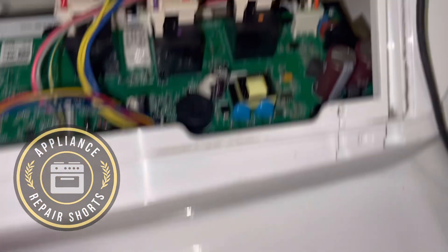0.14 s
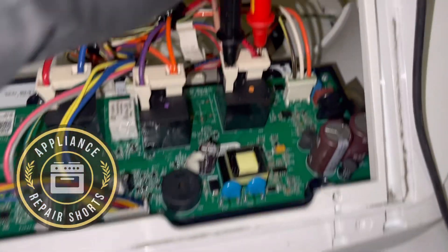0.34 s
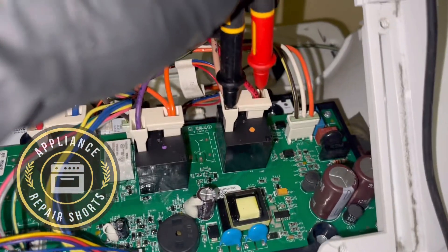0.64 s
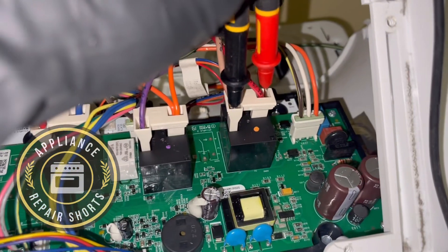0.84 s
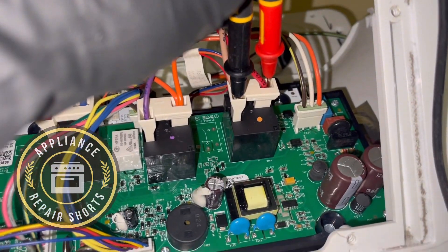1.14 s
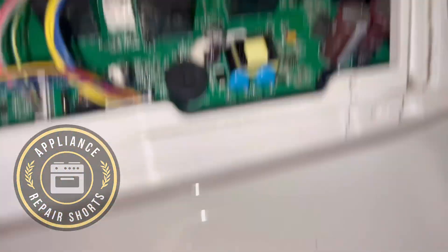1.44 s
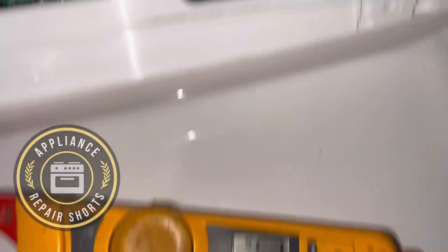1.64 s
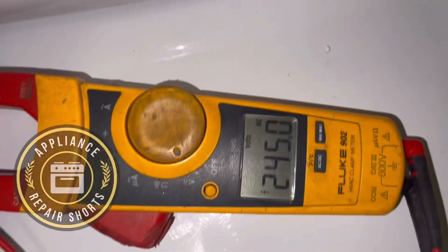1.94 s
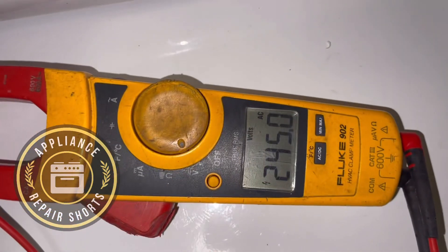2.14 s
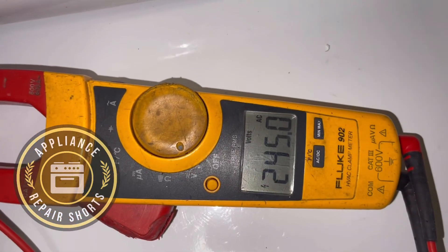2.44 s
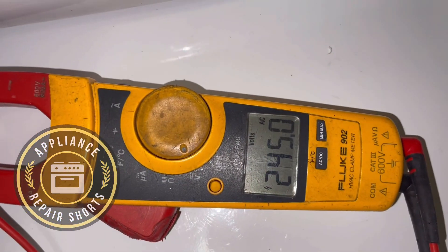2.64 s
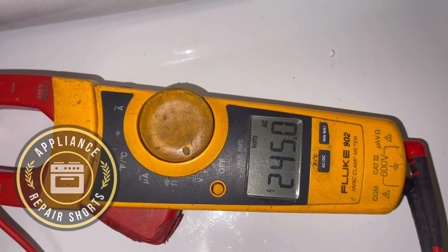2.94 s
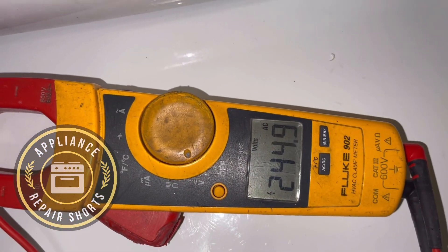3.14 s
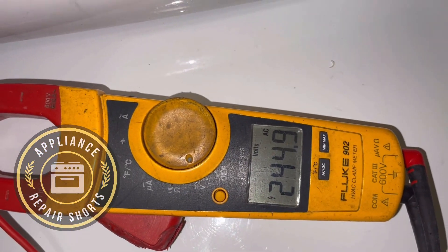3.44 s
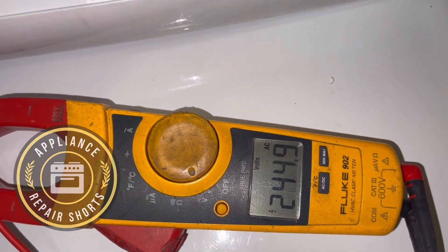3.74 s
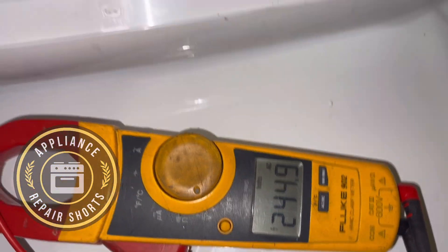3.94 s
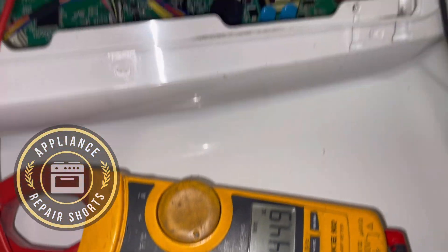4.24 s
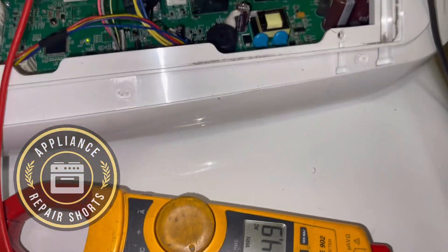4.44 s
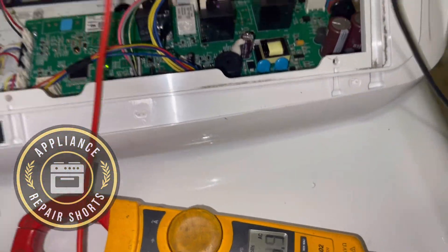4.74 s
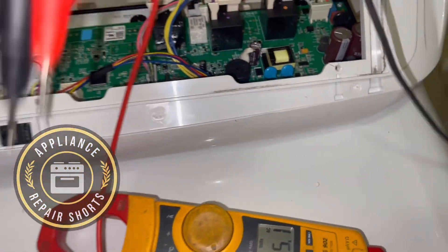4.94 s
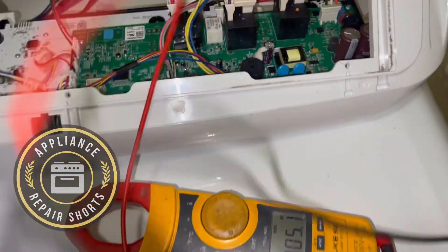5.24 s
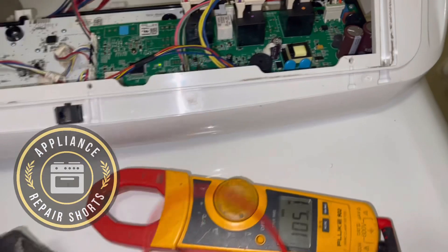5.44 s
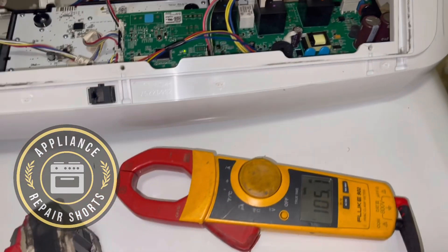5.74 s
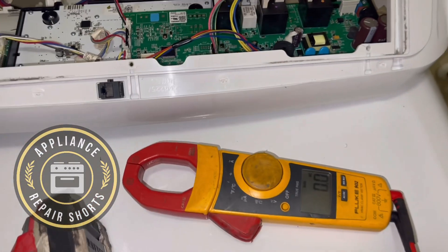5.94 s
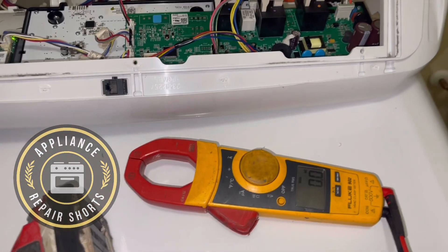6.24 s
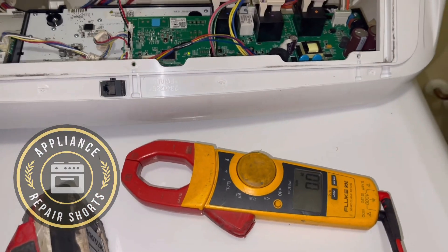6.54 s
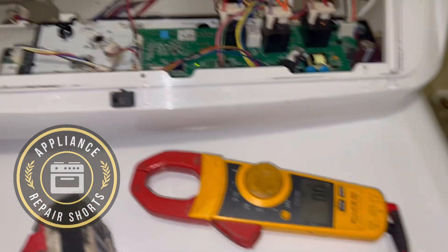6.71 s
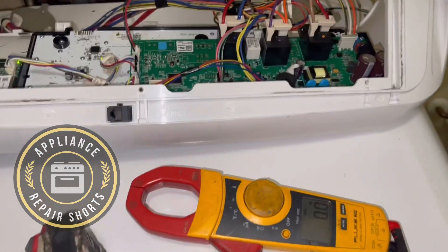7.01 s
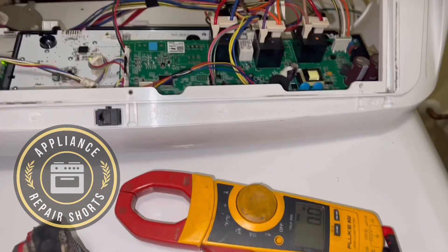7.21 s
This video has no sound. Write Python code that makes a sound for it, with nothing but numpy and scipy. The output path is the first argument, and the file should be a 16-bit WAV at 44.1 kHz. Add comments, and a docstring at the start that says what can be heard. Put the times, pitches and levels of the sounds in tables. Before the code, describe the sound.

A clothes dryer runs in a small room, close to a hand-held stereo microphone. Its motor hums low, the drum rumbles, and a soft blower hiss swells with each turn. From about four seconds the microphone backs away slightly, and test probes and leads tick and scrape on the plastic console, with a quick cluster of taps and a soft glove rustle. The dryer keeps running throughout.

```python
"""A clothes dryer runs with its console open in a small room, close to a hand-held stereo microphone pair.
The motor hums on the mains, the drum rolls, the cabinet rumbles, and shaft, belt and panels add wavering
tones. The blower's hiss swells with each drum turn, and the rumble spreads wide when the microphone swings.
From about four seconds on the microphone backs away, while test probes, leads and a glove tick, scrape
and rustle on the plastic console and the cabinet top."""
import sys
import numpy as np
from scipy import signal
from scipy.fft import rfft, irfft
from scipy.io import wavfile
from scipy.ndimage import uniform_filter1d

SR = 44100
rng = np.random.default_rng(int(sys.argv[2]) if len(sys.argv) > 2 else 0)


def transcribe(u):
    """Save the signal u as a 16-bit wav file named by the first command-line argument.

    u: samples, shape (n,) or (channels, n), limited to [-1, 1]; the rate is SR.
    q: integer samples, one column per channel.
    """
    v = np.clip(np.atleast_2d(u).T, -1, 1)
    q = np.round(v * 32767).astype(np.int16)
    wavfile.write(sys.argv[1], SR, q)


N = 325017
TIME = np.arange(N) / SR
CONTROL_TIME = TIME[::256]  # coarse grid for level curves [s]


def amp(db):
    """Decibels to gain."""
    return 10 ** (np.asarray(db) / 20)


def unit_rms(x):
    """Scales to rms 1."""
    return x / np.sqrt(np.mean(x ** 2) + 1e-20)


def curve(points, x):
    """Straight lines through (x, value) points."""
    return np.interp(x, *np.transpose(points))


def log_curve(points, hz):
    """A spectrum joined by straight lines on a log-frequency axis."""
    f, value = np.transpose(points)
    return np.interp(np.log(hz + 1), np.log(f + 1), value)


def pan(left_db):
    """Left and right gains that put the left this many dB above the right."""
    return amp(np.vstack([left_db / 2, -left_db / 2]))


def phase_ahead(hz):
    """Phase by which the left microphone leads for sound from ahead."""
    # phase between the microphones (frequency [Hz], left lead [rad])
    phase = [(0, 0), (600, -.1), (1100, -.2), (1900, .1), (4850, 3.14), (5750, 6.28), (6250, 6.28),
             (8500, 9.42), (9600, 9.42), (11750, 12.57), (13000, 12.57)]
    return curve(phase, hz)


def likeness_ahead(hz):
    """How alike the two microphones hear sound from ahead."""
    # coherence of the pair (frequency [Hz], likeness [0-1])
    coherence = [(0, .999), (300, .995), (600, .75), (900, .88), (1800, .96), (2700, .45), (4000, .45),
                 (4800, .8), (5400, .6), (5750, .995), (6200, .995), (6500, .8), (8200, .82), (8700, 1),
                 (9600, 1), (9800, .88), (11500, .8), (12200, .9)]
    return curve(coherence, hz)


def swing(t):
    """Share of the rumble that spreads wide as the microphone swings."""
    # swings of the hand (time [s], wide share before clipping [ratio])
    swings = [(0, 0.5), (.35, 0.5), (.52, 0.04), (1.17, 0.04), (1.3, 0.97), (1.54, 0.92), (1.62, 0.03),
              (1.8, 0.01), (3.65, 0), (4.03, 0.47), (4.14, 1.05), (4.26, 1.1), (4.32, 0.4), (4.5, 0.79),
              (4.9, 0.07), (5.15, 0.99), (5.35, 0.57), (6.0, 0.64), (6.25, 0.98), (6.45, 0.81),
              (6.57, 1.04), (6.61, 1), (6.64, .8), (6.68, 0.98), (6.76, 0.99), (6.85, 0.78), (7.0, 1.02),
              (7.1, 0.5), (7.37, 0.57)]
    return np.clip(curve(swings, t), .001, .999)


def backed_off(t):
    """How far the microphone has backed away, 0 to 1."""
    return np.interp(t, (4.2, 5.8), (0, 1))


def low_bus_db(t):
    """Level of the drum roll and low tones: they drop as the microphone backs away."""
    return -42 - 4 * backed_off(t)


def high_bus_db(t):
    """Level of the upper tones: they sag slowly and duck in a swing."""
    sag_db_per_s, duck_depth = 0.86, 0.75
    return -47 - sag_db_per_s * t + duck_depth * 10 * np.log10(1 - swing(t))


def drum_swell_db(t):
    """The swells that repeat with every turn of the drum."""
    # one turn (time into the turn [s], level [dB])
    swells = [(0.0, -3.5), (0.15, 2), (0.28, -5), (0.37, 0.5), (0.48, 3), (0.56, -1), (0.63, 2.5),
              (0.69, -1), (0.77, 1.5), (0.87, 1.5), (0.95, 3), (1.04, 0.5), (1.12, 1)]
    turn_s = 1.212
    return np.interp(t, *np.transpose(swells), period=turn_s)


def noise_bed(spectrum, fader, patchy_db, flicker_db, left_db, phase=phase_ahead, likeness=likeness_ahead):
    """Stereo noise with drifting patches and broad flicker, riding a fader of (times [s], levels [dB])."""
    hz, t, white = signal.stft(rng.standard_normal((2, N)), SR, nperseg=1024, noverlap=768)
    patches, flicker = rng.standard_normal((2,) + white[0].shape)
    patches = unit_rms(uniform_filter1d(uniform_filter1d(patches, size=12, axis=0), size=8, axis=1))
    flicker = unit_rms(uniform_filter1d(uniform_filter1d(flicker, size=200, axis=0), size=7, axis=1))
    same = np.clip(likeness(hz), 0, 1)[:, None]
    right = (same * white[0] + np.sqrt(1 - same ** 2) * white[1]) * np.exp(-1j * phase(hz))[:, None]
    level_db = log_curve(spectrum, hz)[:, None] + np.interp(t, *fader)
    gain = amp(level_db + patchy_db * patches + flicker_db * flicker) * np.sqrt(SR / 2)
    pair = signal.istft(np.array([white[0], right]) * gain, SR, nperseg=1024, noverlap=768)[1]
    return pair[:, :N] * pan(left_db)


def cabinet_rumble():
    """The cabinet rumbles with the drum's swells; a swing crossfades it from straight ahead to wide."""
    # rumble from ahead (frequency [Hz], density [dB/Hz])
    front_spectrum = [(250, -100), (330, -72), (390, -77), (450, -71.5), (650, -79.5), (850, -79.5),
                      (1100, -83.5), (1500, -90.5), (2000, -95), (2600, -99.5)]
    # rumble spread wide (frequency [Hz], density [dB/Hz])
    wide_spectrum = [(25, -74), (40, -92), (70, -68.5), (100, -57.5), (170, -80.5), (260, -58.5),
                     (330, -76), (430, -70), (650, -75), (850, -74), (1100, -81), (1500, -87.5),
                     (2000, -95), (2600, -101)]
    # the pair turned aside (frequency [Hz], left lead [rad], likeness [ratio])
    turned_aside = [(0, 0.51, 0.85), (246, 2.28, 0.91), (444, 3.25, 0.63), (647, 3, 0.85), (855, 2.98, 0.9),
                    (940, 3.02, 1.05), (1090, 3.2, 0.97), (1245, 3.2, 0.91), (1390, 4.44, 0.49),
                    (1880, 5, 0.075), (2580, 9.7, 0.94)]
    f, lead, same = np.transpose(turned_aside)
    top_cut = [(3600, -110), (5500, -150)]  # (frequency [Hz], density [dB/Hz])
    t = CONTROL_TIME
    swell_db, distance_db = drum_swell_db(t), -1.5 * backed_off(t)
    front_db = 1 + 10 * np.log10(1 - swing(t)) + 0.52 * swell_db + distance_db
    wide_db = 2.5 + 10 * np.log10(swing(t)) + 0.23 * swell_db + distance_db
    front = noise_bed(front_spectrum + top_cut, (t, front_db), patchy_db=1.5, flicker_db=0.7, left_db=1)
    wide = noise_bed(wide_spectrum + top_cut, (t, wide_db), patchy_db=2.5, flicker_db=2, left_db=0.15,
                     phase=lambda hz: np.interp(hz, f, lead), likeness=lambda hz: np.interp(hz, f, same))
    return front + wide


def blower_hiss():
    """The blower's bright rush of air swells with each drum turn."""
    # hiss colour (frequency [Hz], density [dB/Hz])
    spectrum = [(1200, -110), (2300, -93.5), (3000, -97), (4500, -96), (6500, -99), (8500, -96),
                (10800, -95), (11300, -97.5), (11600, -100), (11900, -110), (12200, -125), (12500, -150)]
    fader = (CONTROL_TIME, drum_swell_db(CONTROL_TIME))
    return noise_bed(spectrum, fader, patchy_db=1.56, flicker_db=1.38, left_db=0)


def drum_roll():
    """The turning drum lays down a deep bed of noise."""
    # roll colour (frequency [Hz], density re the low bus [dB/Hz])
    spectrum = [(25, -26), (40, -32), (72, -33), (100, -15), (145, -25.5), (170, -24.5), (260, -19),
                (330, -33), (500, -100)]
    fader = (CONTROL_TIME, low_bus_db(CONTROL_TIME))
    return noise_bed(spectrum, fader, patchy_db=1.5, flicker_db=0, left_db=1.5)


def motor_hum():
    """The motor's iron pulls twice per mains cycle: clean harmonics that widen as the pair turns aside."""
    # hum ride (time [s], fundamental [dB], 4th harmonic [dB], turned aside [0-1])
    ride = [(0, -34, -50.5, 0.06), (.5, -37.5, -46, 0.04), (1.15, -34.5, -47, 0), (1.5, -36, -50, 0.14),
            (2.2, -31.5, -49, 0), (2.7, -34.5, -49.5, 0), (3.2, -32.5, -48, 0), (3.85, -34, -49.5, 0.13),
            (4.25, -36, -43.5, 0.8), (4.6, -35.5, -45, 0.42), (5.05, -39.5, -45, 0.6),
            (5.35, -37, -45, 0.87), (5.6, -45, -42, 0.9), (5.9, -37.5, -59, 1), (6.25, -42, -46.5, 1),
            (6.5, -41, -52.5, 0.93), (7.05, -37, -47, 0.17), (7.37, -39, -60.5, 0)]
    # the 2nd harmonic swells and sinks (time [s], level [dB])
    second_ride = [(0.0, -43.5), (0.02, -38.5), (0.65, -41.5), (0.76, -50), (0.9, -40), (1.17, -49),
                   (1.44, -33.5), (1.5, -44), (1.6, -36), (1.68, -46), (1.78, -36), (2.05, -48),
                   (2.11, -40.5), (3.1, -40.5), (3.22, -52), (3.33, -37.5), (3.55, -50), (3.57, -43.5),
                   (4.33, -40.5), (4.5, -49), (4.58, -39), (4.82, -43), (5.15, -40), (5.21, -55),
                   (5.38, -38), (5.56, -48.5), (6.65, -42.5), (6.69, -53), (6.75, -43), (6.83, -59),
                   (6.9, -43), (7.12, -48), (7.2, -42), (7.37, -48)]
    hum_hz = 120.0
    times, *columns = np.transpose(ride)
    first_db, fourth_db, aside = (np.interp(TIME, times, column) for column in columns)
    # (harmonic, level [dB], left lead when aside [rad], left over right [dB], widening by a swing [0-1])
    harmonics = [(1, first_db, 1.14, 0.76, .05), (2, curve(second_ride, TIME), 1.55, 2.1, .1),
                 (4, fourth_db, 2.86, 0.87, 0.64), (5, high_bus_db(TIME) - 8.5, 2.7, .8, 0.52)]
    out = np.zeros((2, N))
    for harmonic, db, lead, left_db, widening in harmonics:
        phase = 2 * np.pi * (harmonic * hum_hz * TIME + rng.random())
        turned = aside + widening * swing(TIME) * (1 - aside)
        out += np.sqrt(2) * amp(db) * pan(left_db) * np.cos([phase, phase - lead * turned])
    return out


def machine_tones():
    """Shaft, belt and panels sing in narrow noise bands that waver in level and pitch."""
    # fuzzy tones (frequency [Hz], width [Hz], level re their bus [dB], left lead [rad])
    bands = [(57, 4, -6.5, 0.054), (90.6, 8, -5.5, 0.041), (107.6, 8.4, -9, 0.05), (253, 7, -8.5, 0.18),
             (269.1, 6.6, -8, 0.18), (302, 6.1, -15, 0.15), (352, 13, -12, 0.15), (422.7, 6.2, -14, 0.43),
             (507.8, 2.8, -6.5, 0.25), (553.7, 4.3, -5, 1.66), (626.5, 3.7, -14, 0.74),
             (864, 66, -8.5, 0.2), (1178, 43, -16, 0.27), (1370, 75, -18, 0.35)]
    low_db, high_db = low_bus_db(TIME), high_bus_db(TIME)
    out = np.zeros((2, N))
    for hz, width_hz, db, lead in bands:
        pole = np.exp(-np.pi * abs(width_hz) / SR)
        real, imag = rng.standard_normal((2, N))
        waver = signal.lfilter([1], [1, -2 * pole, pole * pole], real + 1j * imag)
        steady = 1.13 * (width_hz < 6)  # the narrowest tones have a steady core
        tone = (waver / np.std(waver) + steady) * np.exp(2j * np.pi * hz * TIME)
        pair = unit_rms(np.array([tone.real, (tone * np.exp(-1j * lead)).real]))
        panel_db = 4.5 * swing(TIME) * (200 < hz < 297.3)  # panel tones swell in a swing
        bus_db = low_db if hz < 385 else high_db
        out += amp(db + panel_db + bus_db) * pair
    return out


def console_touch(start_s, db, rise_s, t60_s, centre_hz, spread_octaves, ring, top_cut=None):
    """One touch on the console: a grainy burst of noise sets the plastic ringing."""
    # console modes (frequency [Hz], t60 [s], level re the plain burst [dB])
    modes = [(820, .04, 11), (1186, 0.035, 11), (1516, 0.02, 7), (1940, 0.053, 11), (2660, 0.034, 11),
             (2990, 0.033, 5), (3350, 0.045, 11), (4130, 0.04, 9), (5760, 0.016, 5.5), (6440, 0.022, -1),
             (7600, 0.011, -1), (9200, 0.0023, 8.5), (10750, 0.0065, 7.5), (11500, 0.011, 12)]
    # the microphones dull the top of a touch (frequency [Hz], gain [dB])
    treble = [(11500, -3), (12000, -10), (14500, -23), (15500, -30)]
    size, pre_roll = 16384, 256  # samples; the pre-roll holds the filter's short run-up
    grain_db, grain_s, least_likeness, right_db = 2, .0007, 0.69, 0.5
    t, hz = np.arange(size) / SR, np.fft.rfftfreq(size, 1 / SR)
    left, other = rfft(rng.standard_normal((2, size)))
    same = np.maximum(likeness_ahead(hz), least_likeness)  # so close a sound stays alike in both sides
    same = np.clip(same * np.interp(hz, (600, 4500), (.6, 1)), 0, 1)  # wider toward the bass
    right = (same * left + np.sqrt(1 - same ** 2) * other) * np.exp(-1j * phase_ahead(hz))
    envelope = np.minimum(t / rise_s, 1) * amp(-60 * np.maximum(t - rise_s, 0) / t60_s)
    slips = unit_rms(uniform_filter1d(rng.standard_normal(size), size=round(grain_s * SR)))
    envelope *= amp(grain_db * min(t60_s / 0.024, 1) * slips)  # the touch catches and slips
    burst = envelope * irfft(np.array([left, right * amp(right_db)]))
    plastic = sum(amp(mode_db) / (1 + 2j * np.pi * (hz - mode_hz) * mode_t60 / np.log(1000))
                  for mode_hz, mode_t60, mode_db in modes)
    colour = np.exp(-.5 * (np.log2((hz + 1) / centre_hz) / spread_octaves) ** 2)
    top_db = log_curve(treble, hz) + (log_curve(top_cut, hz) if top_cut else 0)
    rung = irfft(rfft(burst) * (1 + abs(ring) * plastic) * colour * amp(top_db))
    rung = unit_rms(np.roll(rung, pre_roll, axis=1))
    out, start = np.zeros((2, N + size)), round(start_s * SR) - pre_roll
    out[:, start:start + size] = amp(db) * np.sqrt(np.mean(envelope ** 2)) * rung
    return out[:, :N]


def lead_scrapes():
    """Leads and glove drag along the console in longer, grainy touches."""
    # scrapes (time [s], level [dB], rise [s], t60 [s], centre [Hz], spread [octaves], ring [gain])
    scrapes = [(4.272, -32, 0.014, 0.046, 9050, 0.69, 1), (4.268, -44, .022, 0.059, 2600, 0.22, 1.6),
               (4.282, -46, .006, .04, 1700, 0.18, 0.9), (4.300, -46, 0.017, 0.25, 6550, 0.72, 0.4),
               (4.335, -45, .003, 0.075, 2500, 0.41, 0.6), (5.145, -51.5, 0.015, 0.12, 6570, 0.35, .2),
               (5.299, -49, .004, 0.62, 3000, 1.2, .2), (5.513, -35.5, 0.004, 0.2, 2960, 0.92, 0.7),
               (5.540, -34, .015, 0.26, 1800, 1.24, 0.4), (5.581, -34.5, 0.011, 0.2, 1700, 1.1, 0.4),
               (5.604, -36.5, 0.0059, 0.1, 1300, 1, 0.2), (5.620, -40.5, 0.0067, .1, 1200, 1.1, 0.2),
               (5.970, -43.5, .002, 0.13, 3300, 0.74, 0.1), (6.134, -50.5, 0.012, 0.18, 1900, 0.71, 0),
               (6.333, -51, 0.0018, 0.14, 3460, 0.66, 0.3), (6.510, -50, 0.0046, 0.43, 2490, 1.2, 0.5),
               (6.699, -50.5, 0.0065, 0.072, 4000, 1.1, .2), (6.976, -50, .003, 0.15, 6500, .9, 0.3),
               (7.150, -48.5, 0.0071, 0.21, 1780, 0.52, 0.1)]
    # scrapes lack the snap of a tap (frequency [Hz], gain [dB])
    top_cut = [(12200, 0), (12700, -35)]
    return sum(console_touch(*scrape, top_cut=top_cut) for scrape in scrapes)


def probe_taps():
    """Probe tips strike the plastic in short, sharp ticks."""
    # taps (time [s], level [dB], centre [Hz], spread [octaves], ring [gain])
    taps = [(4.330, -29, 2650, 0.25, 1.2), (4.3305, -38, 6500, .4, .1), (4.8422, -25.5, 6640, 0.43, 1),
            (4.8435, -24.5, 9500, 1.1, 0.4), (4.843, -32.5, 1250, .6, 0.5), (5.395, -32, 1490, .22, 1.6),
            (5.395, -41, 4500, 0.49, .1), (5.485, -33.5, 1840, .35, .6), (5.516, -31, 2000, .4, 1.5),
            (5.521, -29.5, 3370, .3, 1.5), (5.544, -33, 2100, 0.66, .9), (5.561, -29, 1300, .6, .9),
            (5.5965, -28, 1390, .6, .9), (5.601, -27, 1000, 0.56, .9), (5.614, -30, 1500, 0.67, .8),
            (5.862, -47, 2500, 0.64, .5)]
    rise_s, t60_s = 0.00076, 0.0052
    return sum(console_touch(start_s, db, rise_s, t60_s, *timbre) for start_s, db, *timbre in taps)


def glove_rustle():
    """Leads and glove brush over the cabinet top: fluttering midrange noise."""
    # strokes of the hand (time [s], level [dB])
    strokes = [(4.7, -34), (4.9, -2), (5.1, -8.5), (5.3, -3), (5.6, 0), (5.95, -5), (6.15, 1), (6.27, -6.5),
               (6.5, 3), (6.56, -15), (6.76, -28), (6.9, -4), (7.2, -8)]
    # rustle colour (frequency [Hz], density [dB/Hz])
    spectrum = [(400, -110), (700, -82.5), (1100, -82), (1500, -88), (2300, -93.5), (3500, -110),
                (6000, -150)]
    return noise_bed(spectrum, np.transpose(strokes), patchy_db=2, flicker_db=2.5, left_db=1.5,
                     likeness=lambda hz: 0.78 * likeness_ahead(hz))


def scene():
    """The running dryer and the hands at work on it, panned by the lean of the microphone."""
    # the microphone leans toward the machine's side (time [s], left over right [dB])
    lean = [(0, .6), (.75, 0), (1.25, 0), (4, 0), (4.75, 0.9), (5.3, .5), (5.75, 1), (6.3, 1), (6.7, -1),
            (7.2, -0.5)]
    dryer = cabinet_rumble() + blower_hiss() + drum_roll() + motor_hum() + machine_tones()
    hands = lead_scrapes() + probe_taps() + glove_rustle()
    return (dryer + hands) * pan(curve(lean, TIME))


def record(dry):
    """The microphones lose the deepest bass, and a steep low-pass trims the very top."""
    low_cut_hz, high_cut_hz = 32, 15800
    low_cut = signal.butter(3, low_cut_hz, "highpass", fs=SR, output="sos")
    high_cut = signal.firwin(511, high_cut_hz, window=("kaiser", 9), fs=SR)
    return signal.oaconvolve(signal.sosfilt(low_cut, dry), high_cut[None], "same")


dry = scene()
out = record(dry)
transcribe(out)
```